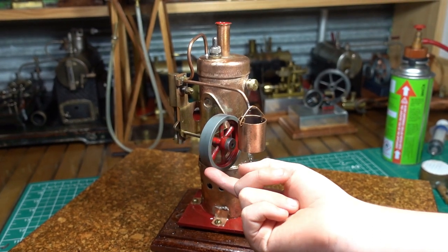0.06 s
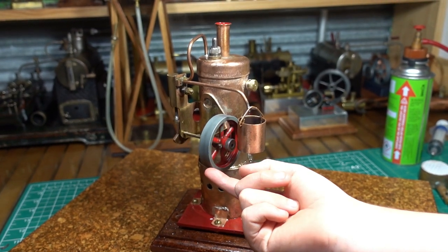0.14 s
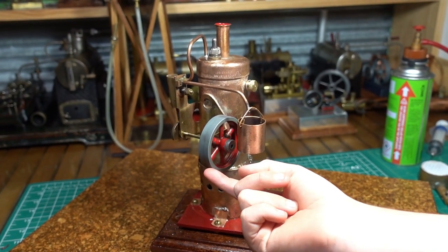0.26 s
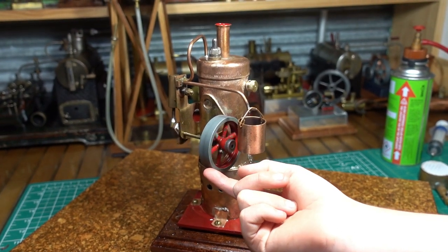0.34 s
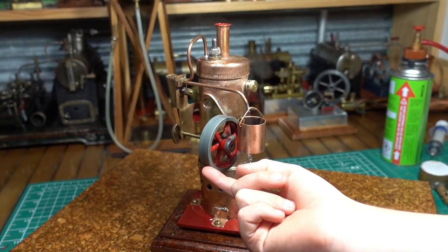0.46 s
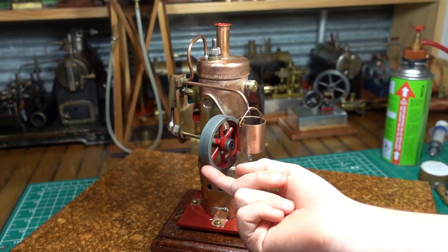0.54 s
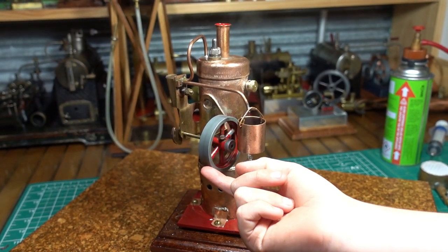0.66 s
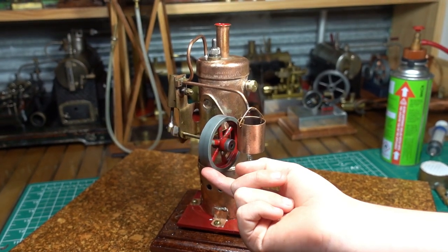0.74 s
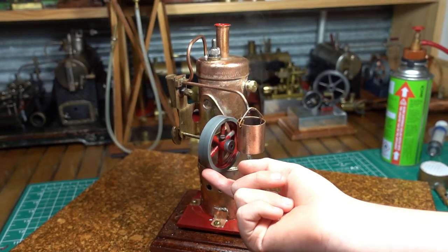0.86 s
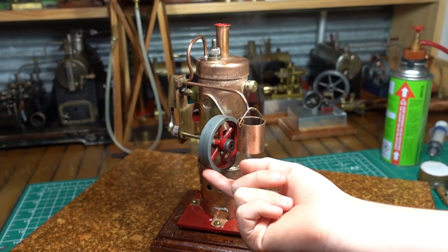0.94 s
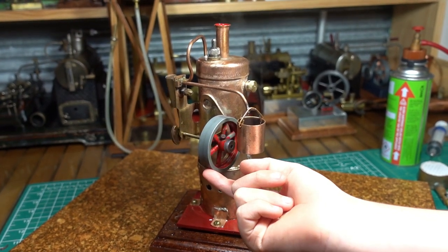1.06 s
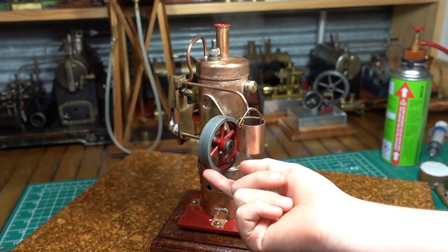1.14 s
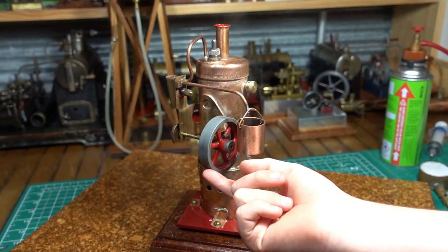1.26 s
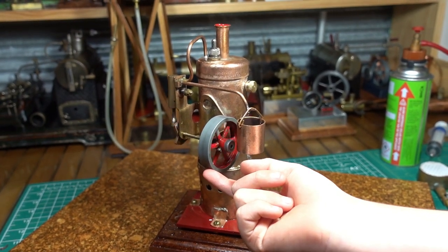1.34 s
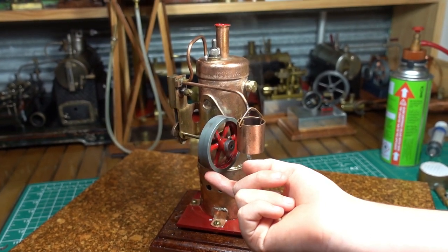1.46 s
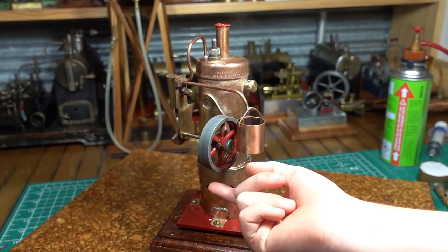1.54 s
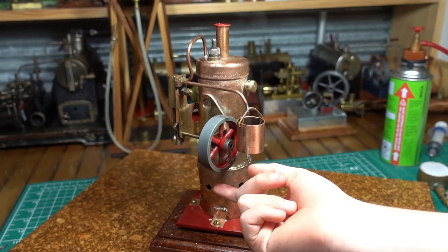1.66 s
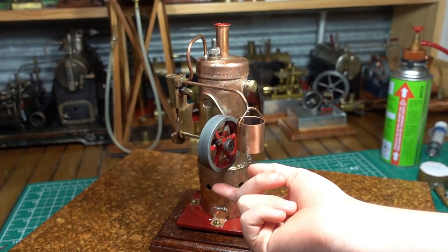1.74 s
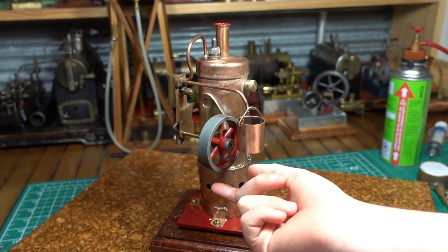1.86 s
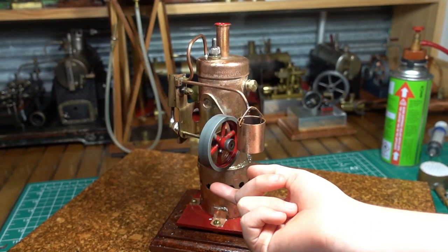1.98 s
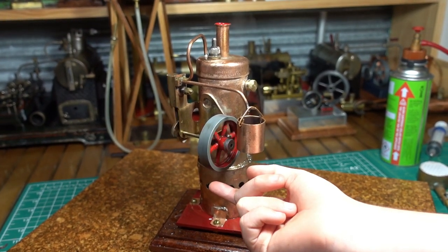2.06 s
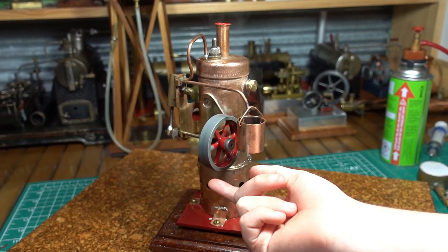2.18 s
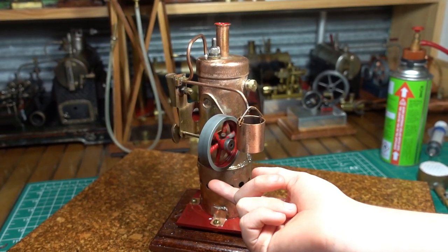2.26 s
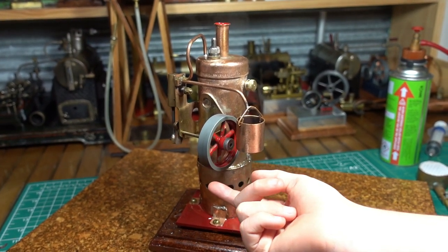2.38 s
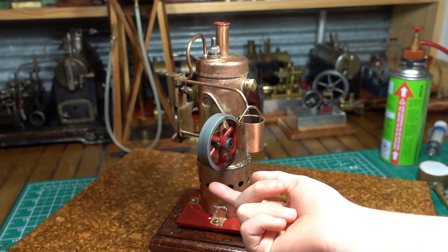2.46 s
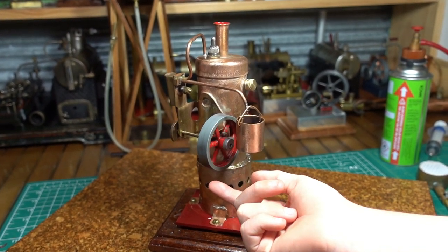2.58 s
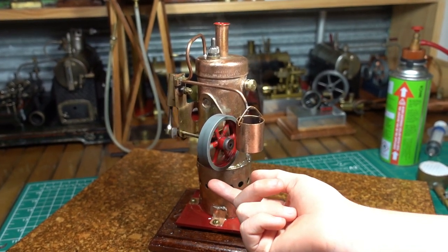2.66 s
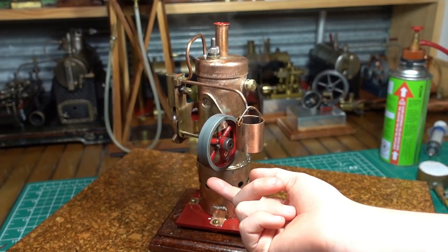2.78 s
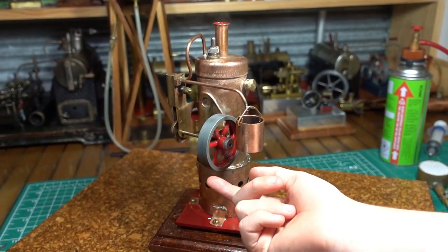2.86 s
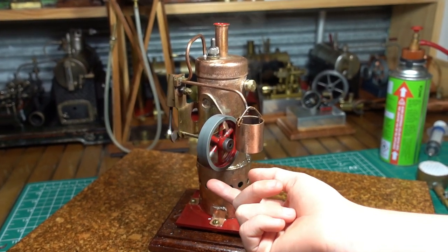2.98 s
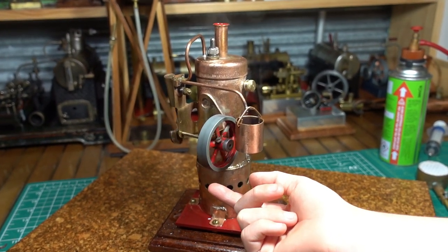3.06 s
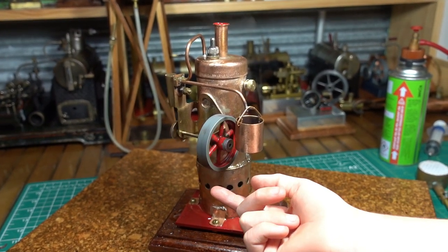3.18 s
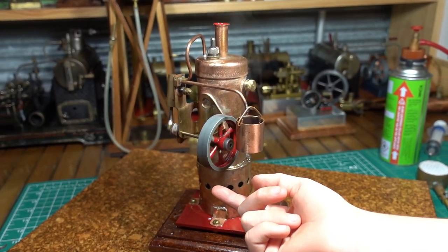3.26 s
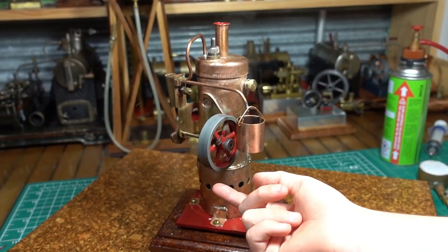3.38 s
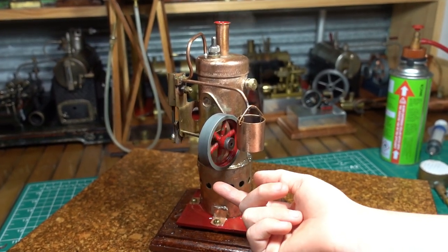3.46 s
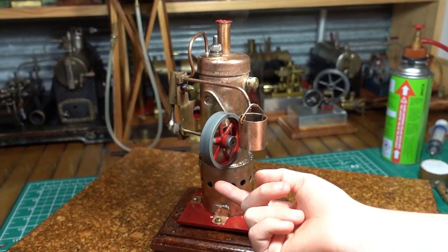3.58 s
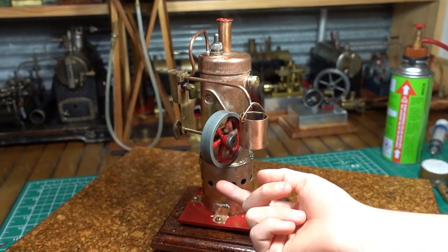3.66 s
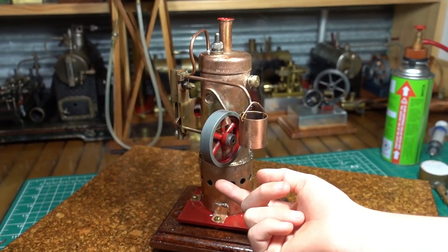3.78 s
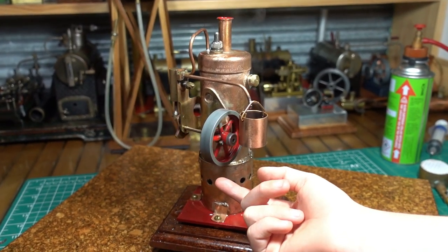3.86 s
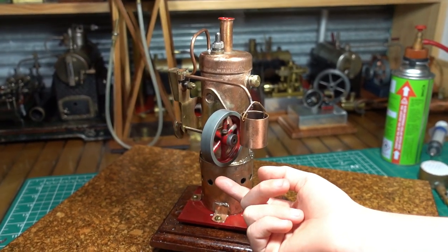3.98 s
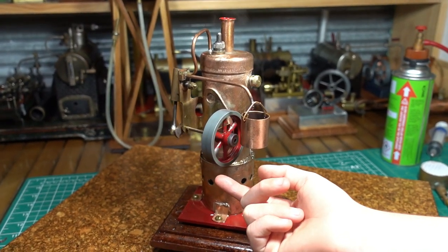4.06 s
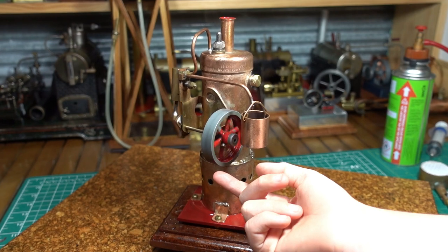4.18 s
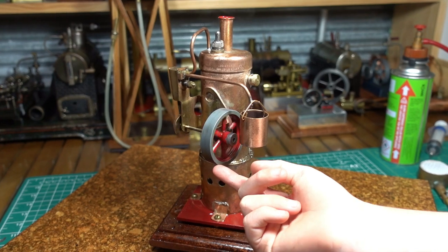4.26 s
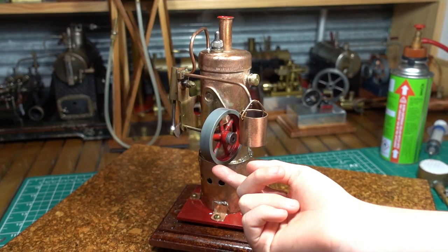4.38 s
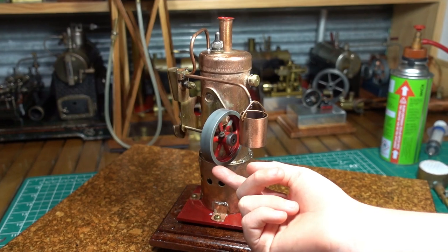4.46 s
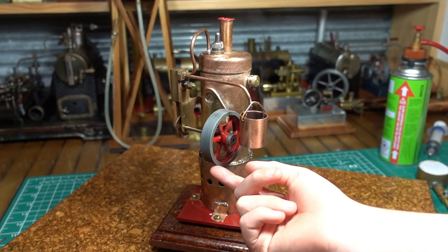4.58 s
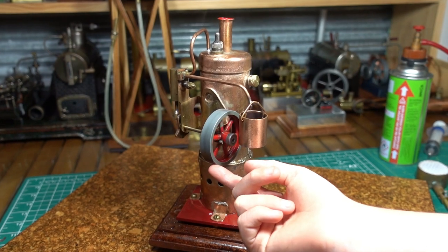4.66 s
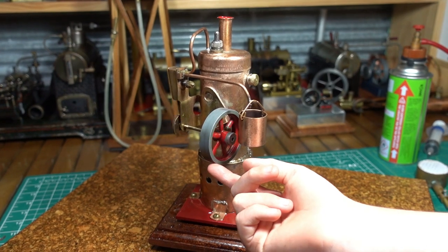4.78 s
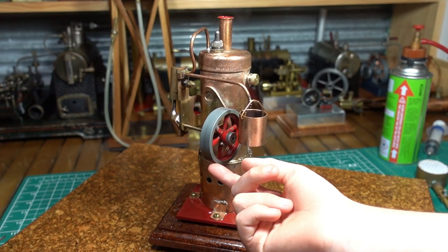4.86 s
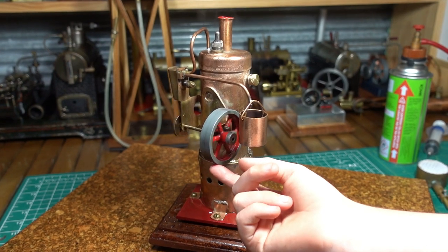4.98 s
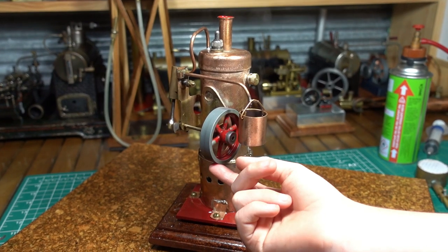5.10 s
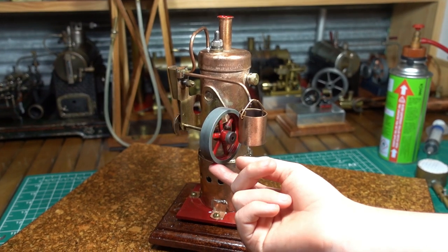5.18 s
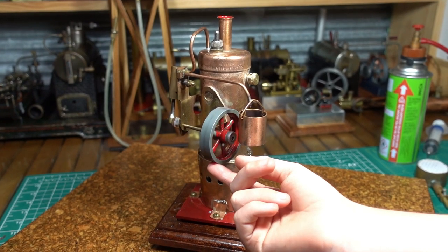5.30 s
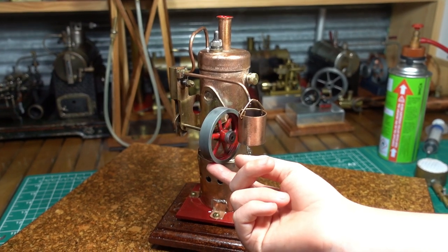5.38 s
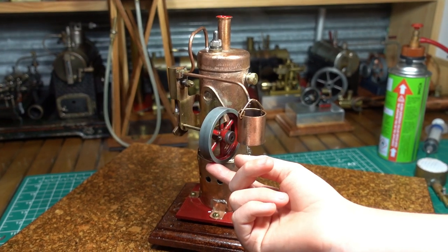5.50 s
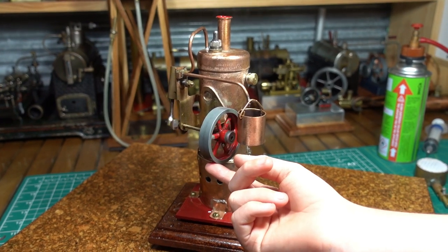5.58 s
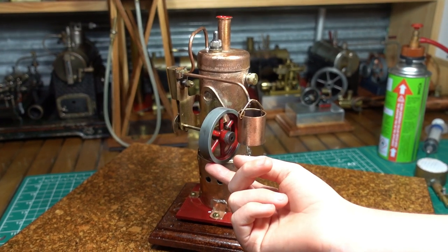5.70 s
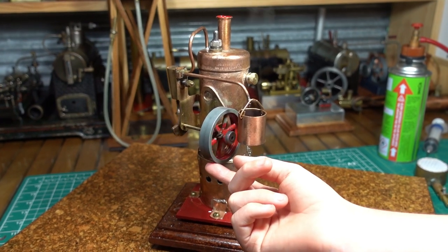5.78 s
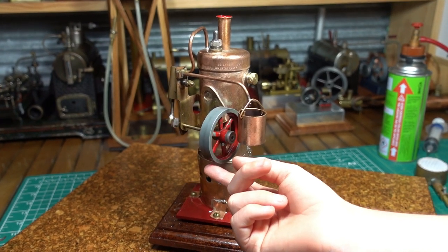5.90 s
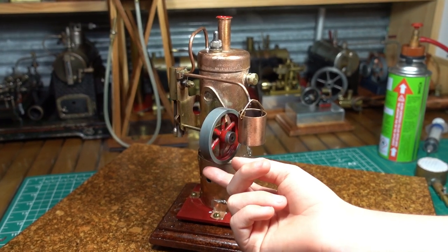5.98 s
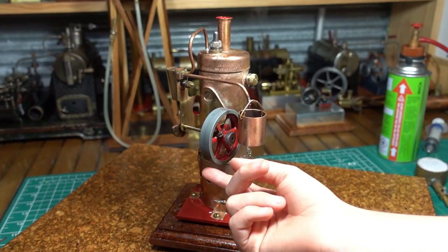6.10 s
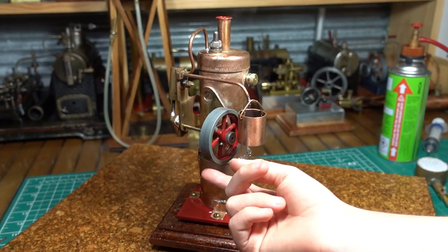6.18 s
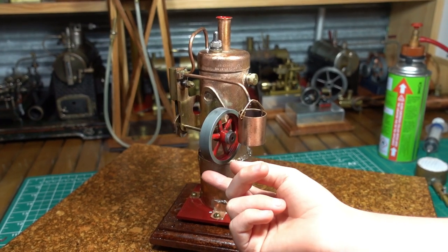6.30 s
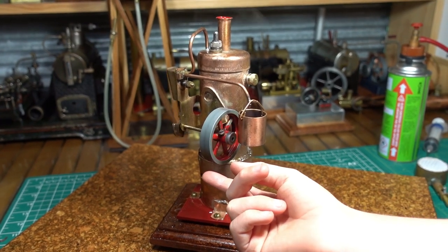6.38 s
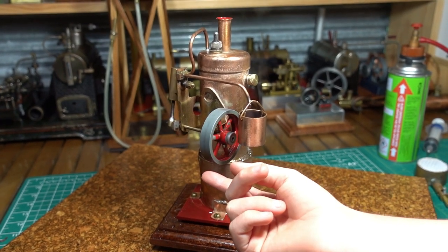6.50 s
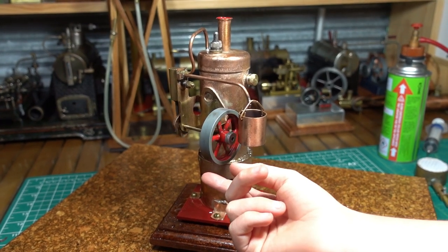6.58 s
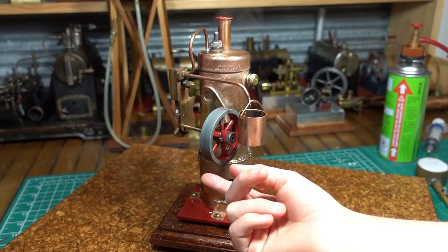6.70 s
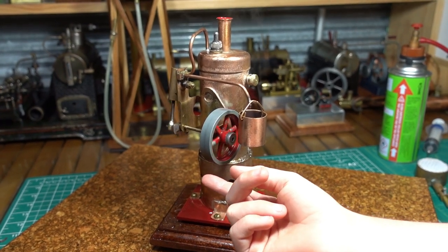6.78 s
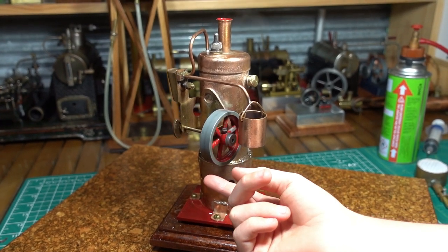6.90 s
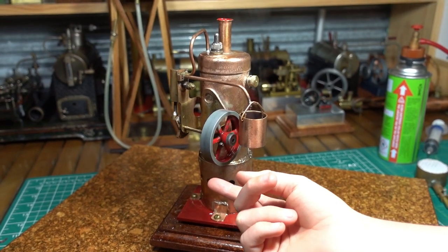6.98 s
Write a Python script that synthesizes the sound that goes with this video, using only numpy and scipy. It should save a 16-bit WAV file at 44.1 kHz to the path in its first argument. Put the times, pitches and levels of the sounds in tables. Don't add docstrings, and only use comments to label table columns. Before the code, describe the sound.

Rapid brassy ticking and clacking of a miniature steam engine with soft steam puffs, running freely mid-way, then braked to a slower, uneven beat.

```python
import sys
import numpy as np
from scipy import signal
from scipy.fft import rfft, irfft
from scipy.io import wavfile
from scipy.ndimage import uniform_filter1d

SR = 44100
rng = np.random.default_rng(int(sys.argv[2]) if len(sys.argv) > 2 else 0)


def store_wav(level_fs):
    pcm = np.round(np.clip(np.atleast_2d(level_fs), -1, 1) * 32767)
    wavfile.write(sys.argv[1], SR, pcm.T.astype(np.int16))


def gain_from_db(level_db):
    decades = np.asarray(level_db, float) / 20
    return 10 ** decades


N = 310596


def evened(x):
    return x / np.sqrt(np.mean(x ** 2) + 1e-20)


def coloured(x, points):
    f, db = np.transpose(points)
    hz = np.fft.rfftfreq(x.shape[-1], 1 / SR)
    curve_db = np.interp(np.log(hz + 1), np.log(f + 1), db)
    return irfft(rfft(x) * gain_from_db(curve_db), x.shape[-1])


def small(x, hz):
    return signal.sosfilt(signal.butter(4, hz, "high", fs=SR, output="sos"), x)


def body(modes, dense, dense_db, dense_t60, spread_db):
    t = np.arange(8192) / SR
    hz, width, db = np.transpose(modes)[:, :, None]
    strike = gain_from_db(db + spread_db * rng.standard_normal((len(modes), 1))) * width
    phase = 2 * np.pi * rng.random((2, len(modes), 1))
    decay = np.exp(-np.pi * width * t)
    ring = (strike * decay * np.sin(2 * np.pi * hz * t + phase)).sum(1)
    hiss = rfft(rng.standard_normal((2, len(t))) * gain_from_db(-60 * t / dense_t60))
    hiss = irfft(hiss / abs(hiss))
    hiss = coloured(hiss, dense) * gain_from_db(-30 * t / dense_t60)
    both = ring / np.linalg.norm(ring[0]) + gain_from_db(dense_db) * hiss / np.linalg.norm(hiss[0])
    both *= 1 - np.exp(-t / 0.00065)
    return both / np.linalg.norm(both, axis=1, keepdims=True)


def bursts(s, db, t60, rise_s):
    t = np.arange(SR // 2) / SR
    out = np.zeros(N + len(t))
    for at, level_db, length in np.broadcast(s, db, t60):
        start = round(at * SR)
        envelope = gain_from_db(level_db - 60 * t / length) * (1 - np.exp(-t / rise_s))
        out[start:][:len(t)] += envelope[:N + len(t) - start]
    return out[:N]


def chatter(envelope, per_s, spread_db):
    size = gain_from_db(spread_db * np.minimum(rng.exponential(1, N), 4)) * rng.choice([-1., 1.], N)
    return envelope * evened(size * (rng.random(N) < per_s / SR))


def ringing(force, response):
    return signal.oaconvolve(force[None], response, axes=1)[:, :N]


def wavering(hz, wander):
    drift = evened(uniform_filter1d(rng.standard_normal((3, N)), 6000))
    tone = np.sin(2 * np.pi * hz * np.arange(N) / SR + wander * drift[:2])
    return gain_from_db(5 * wander * drift[2]) * tone


# (frequency [Hz], level [dB per Hz])
BURNER_COLOUR = [(25, -36), (60, -24.5), (150, -9), (450, -11.5), (700, -3.5), (900, -8), (1500, -3.5),
                 (1950, -7), (2450, 1.5), (3400, -10.5), (4700, -6), (6200, -9), (12000, -13), (16500, -14)]
# (frequency [Hz], level [dB])
DRONE_PARTIALS = [(100, -28), (153, 11), (193, 8.5), (208, 18.5)]
# (time [s], level [dB])
DRONE_SWELL = [
    (0.0, -59),
    (1.31, -58),
    (2.41, -65),
    (3.37, -84),
    (5.06, -86),
    (5.55, -64),
    (7.04, -67.5),
]
BURNER_DB, FLAME_DB, FLAME_HZ = -45, -66, 703


def workshop():
    drone = evened(sum(gain_from_db(db) * wavering(hz, wander=0.56) for hz, db in DRONE_PARTIALS))
    drone_db = np.interp(np.arange(N) / SR, *np.transpose(DRONE_SWELL))
    gust = gain_from_db(2.0 * evened(uniform_filter1d(rng.standard_normal(N), 3000)))
    hiss = gust * evened(coloured(rng.standard_normal((2, N)), BURNER_COLOUR))
    flame = gain_from_db(FLAME_DB) * wavering(FLAME_HZ, wander=0.1)
    return gain_from_db(BURNER_DB - 6.0) * hiss + gain_from_db(drone_db - 7) * drone + flame


# (clack time [s], low ring level [dB], treble over low ring [dB], chatter level [dB], valve tick lead [s])
DRAGGED_TURNS = [(0.0581, -2.5, -1.5, -14.5, 0.027), (0.229, -11.5, 5, -15.5, .0235),
                 (0.407, -7.5, -0.5, -17, 0.03), (0.594, -10, 5, -14, 0.033),
                 (0.79, -5, -3.5, -17.5, 0.035), (0.9918, -4.5, -1.5, -14, 0.033),
                 (1.2, -4.5, -1.5, -16, 0.037), (1.423, -6.5, 4, -16.5, 0.042),
                 (1.6473, -3.5, -2.5, -15.5, 0.035), (1.8521, -5.5, 3, -13, 0.037),
                 (2.0395, -5.5, 0.5, -15.5, 0.034)]
# (clack time [s], low ring level [dB], treble over low ring [dB], chatter level [dB], valve tick lead [s])
FREE_TURNS = [(2.2157, -12, 4.5, -17, .0282), (2.3864, -7, -1, -14, .0274), (2.5475, -12, 7.5, -12, 0.028),
              (2.7034, -11, 5.5, -15, 0.022), (2.8579, -1, -7, -15.5, 0.022), (3.0021, -4, -3, -11.5, .018),
              (3.153, -7.5, -7, -15, 0.016), (3.3212, -11, 2.5, -17, 0.034),
              (3.4737, -3.5, -5, -14.5, .025), (3.6262, -10, 0, -16.5, 0.025), (3.784, -9, 4, -17, .012),
              (3.9379, -7, -2.5, -16.5, 0.025), (4.0903, -5.5, -6.5, -17.5, 0.026),
              (4.2426, -5.5, -5, -13.5, 0.023), (4.3998, -5, 0.5, -14, 0.025)]
# (clack time [s], low ring level [dB], treble over low ring [dB], chatter level [dB], valve tick lead [s])
BRAKED_TURNS = [(4.572, -1.5, -4.5, -16, 0.033), (4.7429, -5, -0.5, -15, 0.031),
                (4.9285, -8.5, 4.5, -14.5, 0.033), (5.1132, -7, -3, -14.5, 0.023),
                (5.3469, -0.5, -5.5, -15.5, 0.048), (5.6062, -6.5, -1.5, -16.5, .0548),
                (5.9287, -5.5, -0.5, -17, 0.065), (6.2413, -11, 5, -16.5, 0.061),
                (6.53, -7, 1.5, -14.5, 0.055), (6.7996, -5, -1, -16, .0525), (7.06, -4, -3, -16, 0.046)]


def turns():
    rows = DRAGGED_TURNS + FREE_TURNS + BRAKED_TURNS
    at, ring_db, treble_db, chatter_db, lead = np.transpose(rows)
    return at, ring_db, treble_db, chatter_db, at - lead


# (time [s], peak level [dB], treble over low ring [dB])
SLACK_CONTACTS = [(0.015, -22, -10), (0.2193, -19, -22), (0.425, -20, -9), (0.612, -12, -2),
                  (1.8697, -10.5, -5), (2.4144, -23, 0), (2.578, -21, -13), (2.734, -10.5, -14),
                  (2.862, -17, 6), (2.9642, -17.5, -9), (3.0107, -16.5, 9), (3.025, -14, 3),
                  (3.037, -16, -10), (3.1666, -1.5, -13), (3.197, -12, -25), (3.3112, -3.5, -22),
                  (3.3465, -18, -20), (3.462, -9, -26), (3.501, -13, -9), (4.264, -10.5, -3),
                  (4.558, -8.5, -14), (4.5675, -11, -3), (3.772, -10.5, -12), (5.126, -11, 0.5),
                  (5.3287, -7.5, -5), (4.918, -7, -6), (6.221, -17.5, -9), (6.5147, -18.5, -1),
                  (6.784, -18.5, -3.5), (7.033, -22, -16)]
FRAME_PITCHES = [1790, 2100, 2302, 2423, 2515, 2590, 2669, 2735, 2803, 3011, 3290, 3785, 4531, 4610, 4683,
                 4838, 5007, 5250, 6220, 6410, 6841, 7250, 7499, 8185, 8586, 8810, 10259, 10700, 11150]
# (width [Hz], level [dB])
FRAME_MODES = [(75.6, -15), (33, -13), (26, -18.5), (40.7, 0.5), (55, -1), (47.7, -5), (35, 4.5), (40, -3),
               (37.037, -9), (24.7, -7), (192, -8.5), (49, -9), (34.8, -0.5), (40.5, -3), (48.4, -1.5),
               (44.8, -4), (48.6, -5), (121, -5.5), (60, -9), (57, -5), (98, -8.5), (91, -8), (65.5, -0.5),
               (102, -9), (56, -3.5), (42, -12), (31, -8), (79, -13.5), (79, -9)]
# (frequency [Hz], level [dB per Hz])
FRAME_HISS = [(500, -29), (800, -23), (1200, -17.5), (2250, -11), (2600, -9.5), (2950, -31.5), (3600, -9),
              (4200, -6), (4750, -2), (5800, -9.5), (7000, -5), (9500, -15.5), (13000, -22), (16000, -19.5)]
LOADED_TURNS = [
    1,
    15,
]
LOADED_DB = -8.5
TICK_DB, TICK_TREBLE_DB, TICK_CHATTER_DB = -11, -8.5, -30.5
TICK_DULLS_DB_PER_S, TICK_SOFTENS_DB_PER_S = 150, 95
SCRAPE_GROWS_DB_PER_S = 120
CHATTER_T60 = 0.25


def linkage(count=5):
    at, ring_db, top_db, chatter_db, valve_s = turns()
    lead = at - valve_s
    loaded_db = LOADED_DB * np.isin(np.arange(len(at)), LOADED_TURNS)
    clacks = np.c_[at, ring_db, top_db]
    tick_db = TICK_DB + loaded_db - TICK_SOFTENS_DB_PER_S * lead
    ticks = np.c_[valve_s, tick_db, TICK_TREBLE_DB - TICK_DULLS_DB_PER_S * lead]
    s, db, treble_db = np.r_[clacks, ticks, SLACK_CONTACTS].T
    s = s - .0015

    after = bursts(at, chatter_db - 9.5, CHATTER_T60, 0.0023)
    after += bursts(valve_s - .002, TICK_CHATTER_DB + loaded_db, 0.16, 0.0013)
    scrape_db = chatter_db - 20 + SCRAPE_GROWS_DB_PER_S * lead
    after += bursts(at - .006, scrape_db, 0.034, 0.001)

    out, grit = np.zeros((2, N)), rng.standard_normal(N)
    for k in range(count):
        frame = body(np.c_[FRAME_PITCHES, FRAME_MODES], FRAME_HISS, dense_db=-2.5, dense_t60=0.056, spread_db=1.7)
        treble = coloured(frame, [(3200, -17.5), (4200, -1.5)])
        own = slice(k, None, count)
        loose = chatter(after, per_s=900, spread_db=4.0) / np.sqrt(count)
        low_hit = grit * bursts(s[own], db[own] + 0.5, 0.03, 0.0033)
        top_hit = grit * bursts(s[own], db[own] + treble_db[own] + 2.5, 0.022, 0.0015)
        out += ringing(low_hit + gain_from_db(-1.45) * loose, frame - treble)
        out += ringing(top_hit + gain_from_db(-0.36) * loose, treble)
    return out


PLATE_PITCHES = [290, 325, 400, 490, 632, 810, 880, 1165, 1230]
# (width [Hz], level [dB])
PLATE_MODES = [(34.7, -5), (37.8, -8), (34.7, -11.5), (50, -19), (37.037, -0.5), (45, 0), (45, 4.5),
               (39.8, 11), (29, 4)]
BOILER_NOTE_HZ, BOILER_T60 = 632, .1
THUMP_DB, THUMP_SPREAD_DB = -46.5, 2
USUAL_CHATTER_DB = -13
SHAKE_DB, SHAKE_FOLLOWS = -40.5, 0.45


def base():
    at, *_, chatter_db, valve_s = turns()
    t = np.arange(SR // 4) / SR
    push = np.zeros(N)
    push[(valve_s * SR).astype(int)] = gain_from_db(THUMP_DB + 7 + THUMP_SPREAD_DB * rng.standard_normal(len(at)))
    note = gain_from_db(0.8 - 60 * t / BOILER_T60) * np.sin(2 * np.pi * BOILER_NOTE_HZ * t)
    note *= 1 - np.exp(-t / 0.0087)
    plate = body(np.c_[PLATE_PITCHES, PLATE_MODES], BURNER_COLOUR, dense_db=-25, dense_t60=.05, spread_db=2.5)
    stroke_db = SHAKE_DB + SHAKE_FOLLOWS * (chatter_db - USUAL_CHATTER_DB)
    shake = bursts(at, stroke_db + 2.5, 0.11, 0.0043) * rng.standard_normal(N)
    return ringing(push, note[None]) + small(ringing(shake, plate), 290)


# (frequency [Hz], level [dB])
BENCH_COLOUR = [(40, -22), (90, -5), (200, -27.5), (300, 0), (340, -7.5), (450, -8), (600, -27)]
BENCH_DB, BENCH_SPREAD_DB, BENCH_T60 = -55, 3.0, 0.15


def bench():
    at = turns()[0]
    db = BENCH_DB + BENCH_SPREAD_DB * rng.standard_normal(len(at))
    thud = evened(coloured(rng.standard_normal((2, N)), BENCH_COLOUR))
    return bursts(at, db, BENCH_T60, 0.011) * thud


# (frequency [Hz], level [dB])
STEAM_COLOUR = [(200, -40), (600, -19), (1200, 16), (2500, 14), (5000, -26), (8000, -13), (12000, 24),
                (16500, -7)]
PUFF_DB, PUFF_FOLLOWS = -35, .45


def exhaust():
    at, *_, chatter_db, _ = turns()
    db = PUFF_DB + PUFF_FOLLOWS * (chatter_db - USUAL_CHATTER_DB)
    flutter = gain_from_db(2.2 * evened(uniform_filter1d(rng.standard_normal(N), 200)))
    steam = evened(coloured(rng.standard_normal((2, N)), STEAM_COLOUR))
    return bursts(at, db, 0.83 * CHATTER_T60, 0.0034) * flutter * steam


# (time [s], peak level [dB], hollow body under the ring [dB])
ROD_KNOCKS = [(0.1259, -23.5, 3.5), (0.3022, -30, -7), (0.4854, -20, -10), (0.663, -27, -25),
              (0.874, -21, -31), (1.726, -23, -22), (1.93, -21, -8), (2.113, -21, -3), (2.2837, -20.5, -11),
              (2.4513, -26.5, -20), (2.6134, -24.5, 3.5), (2.768, -27.5, -21), (2.919, -23, 0),
              (3.071, -31, 7), (3.2245, -20, -5), (3.692, -21, 0.5), (3.8465, -24.5, 2.5),
              (3.9984, -26.5, -16), (4.307, -26.5, 2), (4.4687, -22.5, -8), (4.6361, -20, -10),
              (4.816, -16.5, -6.5), (5.0063, -21.5, -5), (5.2073, -20, 2.5), (5.441, -19, -8),
              (5.7257, -20.5, -13), (6.0581, -19.5, -3.5), (6.3615, -19, -11), (6.6402, -16, -9),
              (6.903, -19, -11)]
ROD_PITCHES = [1150, 1420, 1680, 2090, 2810, 3060, 3190, 3300]
# (width [Hz], level [dB])
ROD_MODES = [(89, 5.5), (71, 5), (70, -60), (74.074, -38), (90, -9), (70, -2.5), (70.4, 20), (72, 5.5)]
# (frequency [Hz], level [dB per Hz])
ROD_HISS = [(600, -37), (1000, -21), (1700, -8), (2400, -8), (3150, 1), (3600, -29), (5000, -24),
            (9000, -13), (16000, -36)]


def rod(count=3):
    s, db, hollow_db = np.transpose(ROD_KNOCKS)
    out, grit = np.zeros((2, N)), rng.standard_normal(N)
    for k in range(count):
        own = slice(k, None, count)
        ring = body(np.c_[ROD_PITCHES, ROD_MODES], ROD_HISS, dense_db=2.5, dense_t60=0.05, spread_db=2.5)
        hollow = coloured(ring, [(2300, -3.5), (2700, -60)])
        touch = bursts(s[own] - .007, db[own] - 11.5, 0.03, 0.00066)
        knock = bursts(s[own] - .001, db[own] + 2, 0.011, 0.0006)
        hollow_knock = bursts(s[own] - .001, db[own] + hollow_db[own] + 6, 0.016, 0.00081)
        out += ringing(grit * (knock + touch), ring - hollow)
        out += ringing(grit * hollow_knock, hollow)
    return out


def room(x):
    t = np.arange(SR // 2) / SR
    sparse = rng.random((2, len(t))) < 2000 / SR
    taps = rng.choice([-1., 1.], (2, len(t))) * sparse * (t > .004)
    tail = coloured(taps * gain_from_db(-60 * t / 0.25), [(500, 9), (4000, 0.5), (12000, -7.5)])
    return ringing(x[0], tail / np.linalg.norm(tail[0]))


# (frequency [Hz], side over mid level [dB])
STEREO_WIDTH = [(60, -23), (150, -32.5), (380, -16.5), (950, -9.5), (2380, -7.5), (5980, 0), (15000, -3)]


def scene():
    engine = small(linkage() + rod() + exhaust(), 870) + base()
    mid, side = engine + gain_from_db(-9.5) * room(engine) + workshop() + bench()
    side = gain_from_db(-1.83) * coloured(side, STEREO_WIDTH)
    return np.array([gain_from_db(-1.12) * (mid + side), gain_from_db(-1.26) * (mid - side)])


def roll_off(x):
    return signal.sosfilt(signal.butter(12, 16980, fs=SR, output="sos"), x)


def record(dry):
    dull = coloured(dry, [(15700, 0), (15950, -32), (17000, -46)])
    return roll_off(dull)


dry = scene()
out = record(dry)
store_wav(out)
```